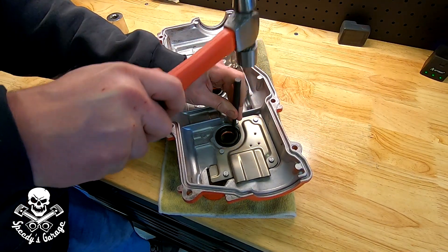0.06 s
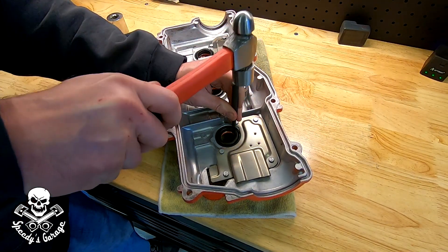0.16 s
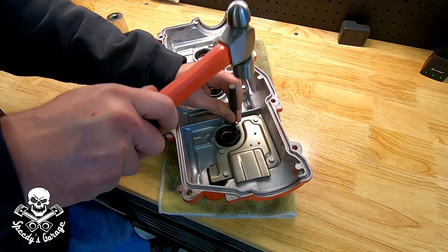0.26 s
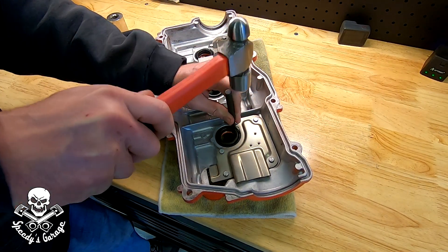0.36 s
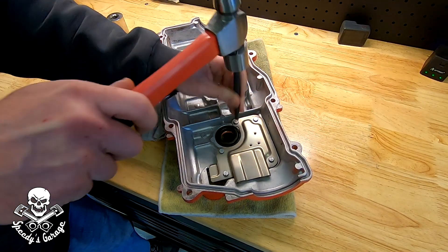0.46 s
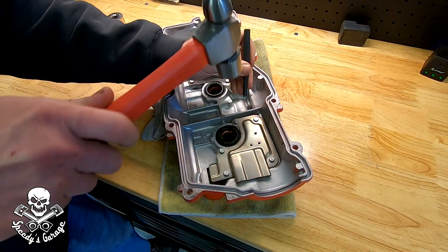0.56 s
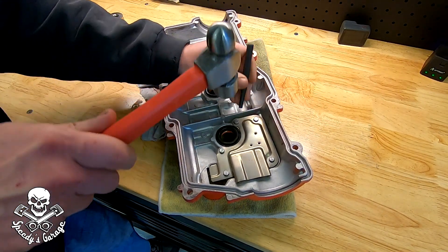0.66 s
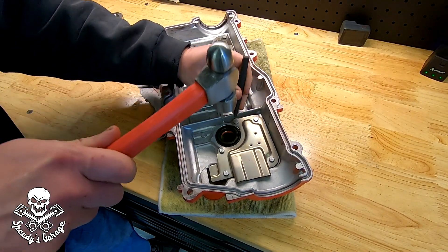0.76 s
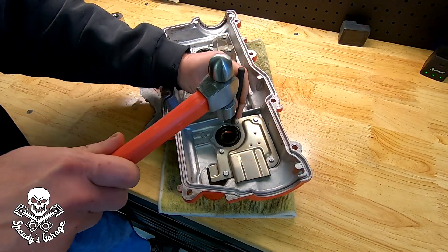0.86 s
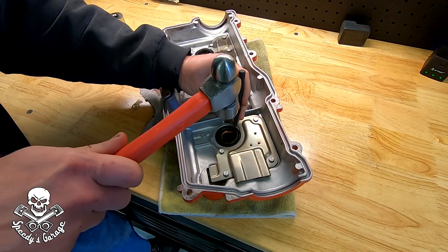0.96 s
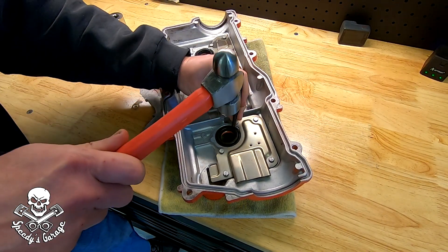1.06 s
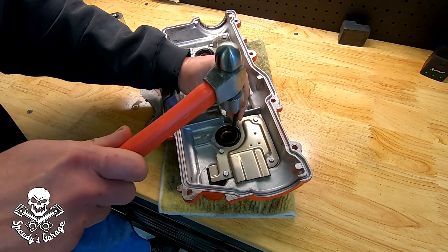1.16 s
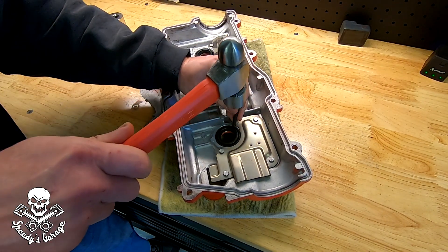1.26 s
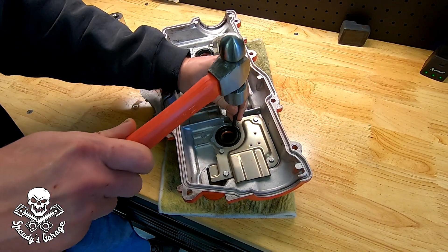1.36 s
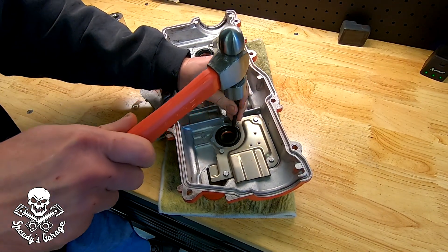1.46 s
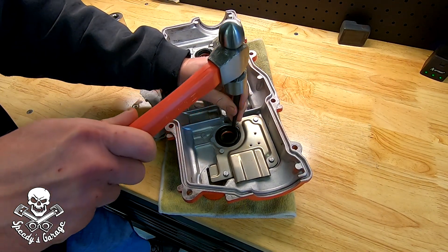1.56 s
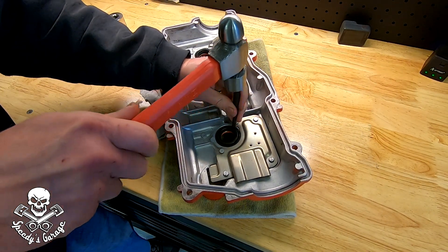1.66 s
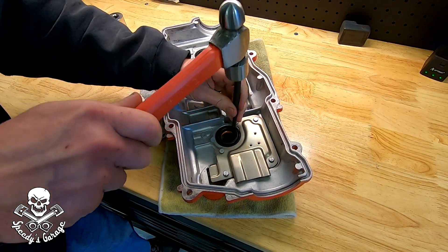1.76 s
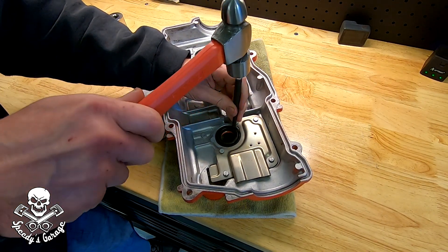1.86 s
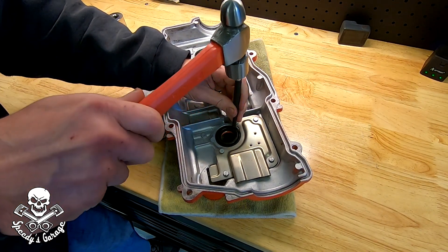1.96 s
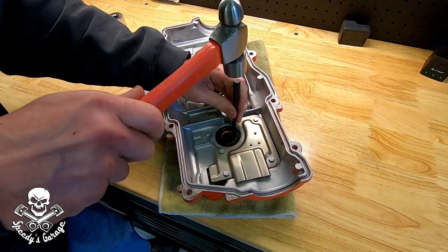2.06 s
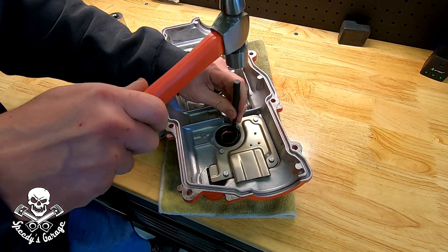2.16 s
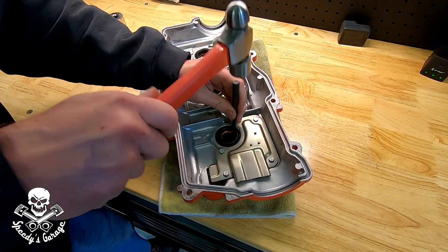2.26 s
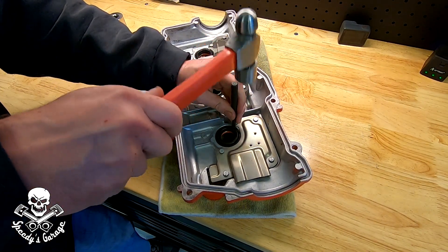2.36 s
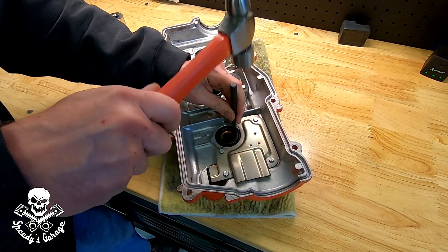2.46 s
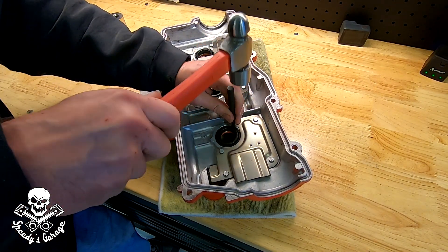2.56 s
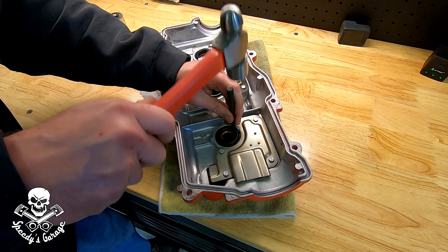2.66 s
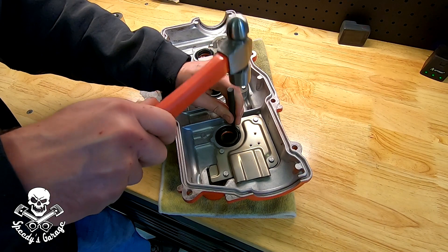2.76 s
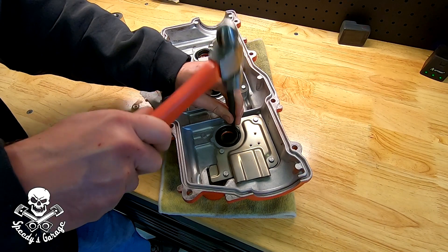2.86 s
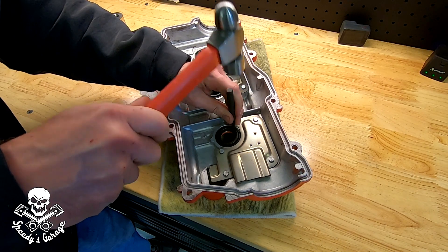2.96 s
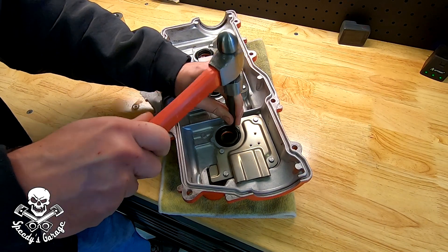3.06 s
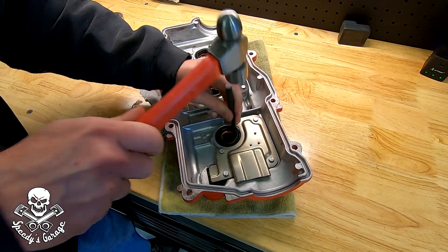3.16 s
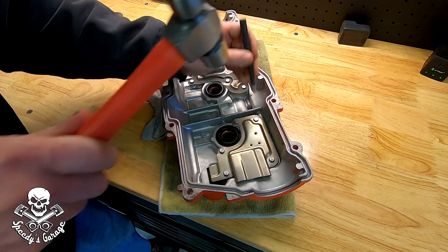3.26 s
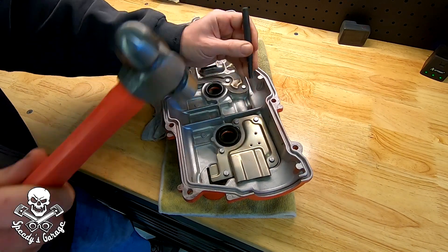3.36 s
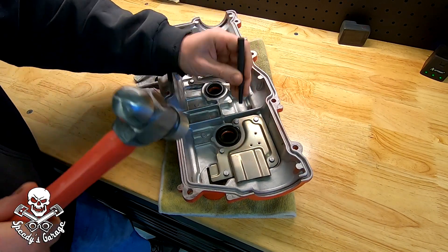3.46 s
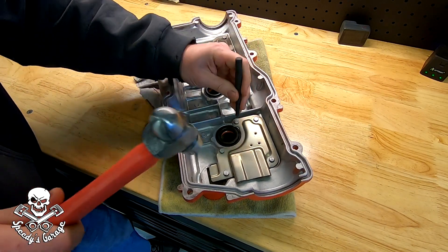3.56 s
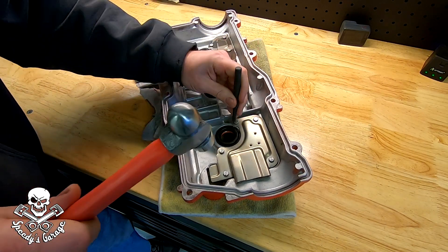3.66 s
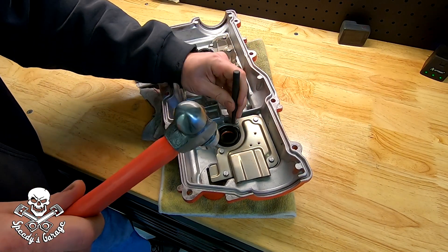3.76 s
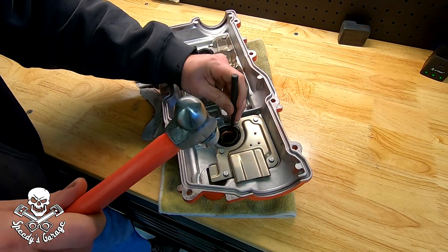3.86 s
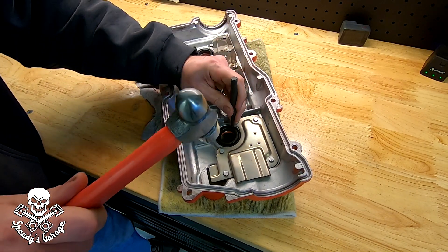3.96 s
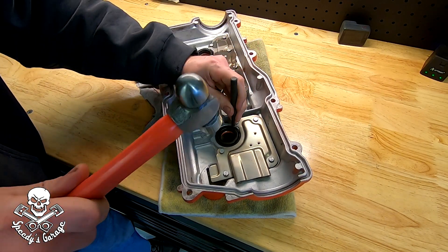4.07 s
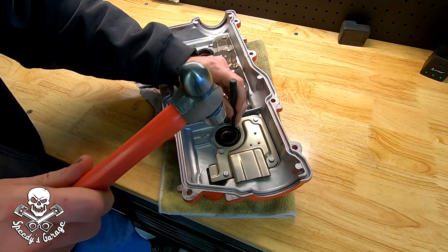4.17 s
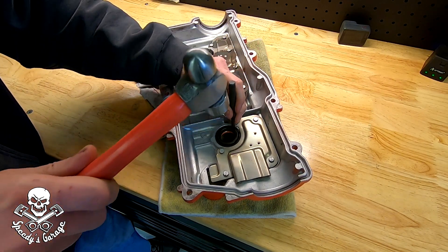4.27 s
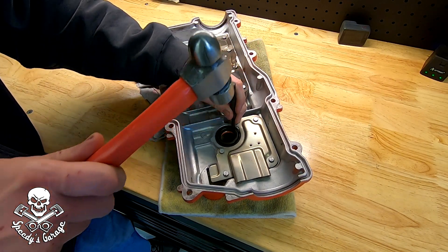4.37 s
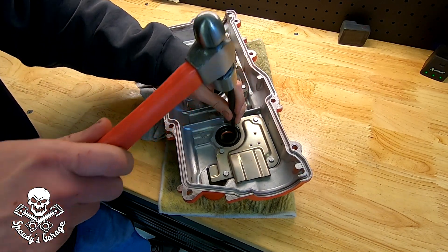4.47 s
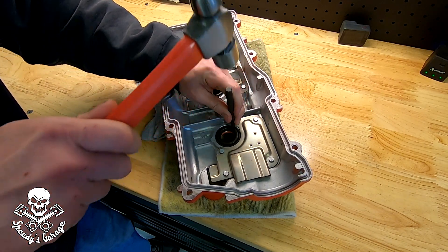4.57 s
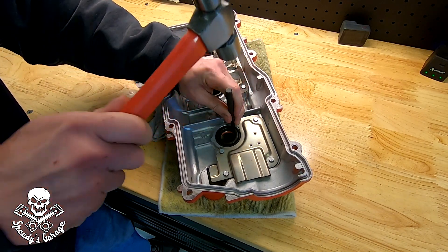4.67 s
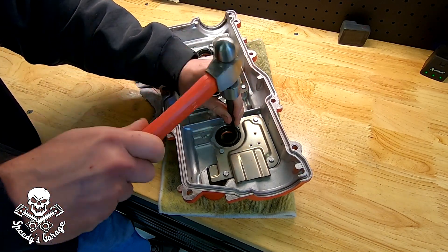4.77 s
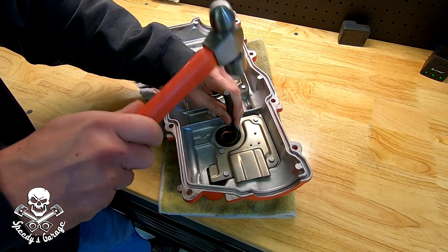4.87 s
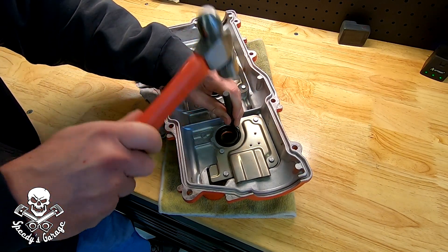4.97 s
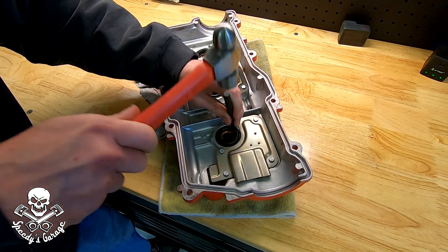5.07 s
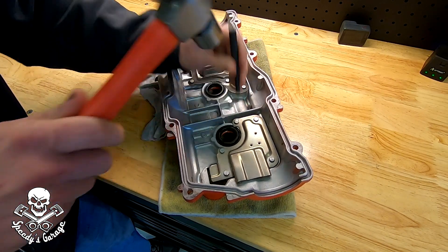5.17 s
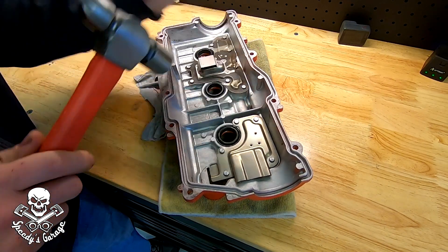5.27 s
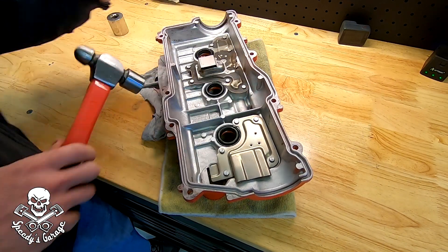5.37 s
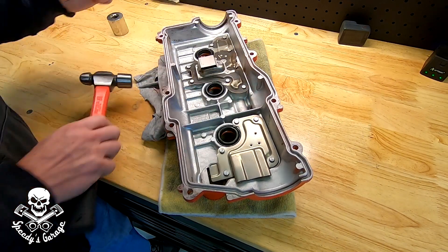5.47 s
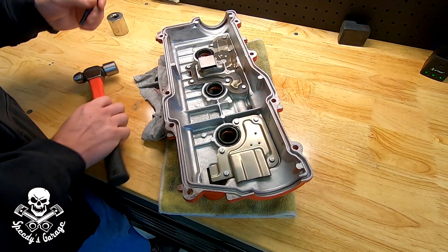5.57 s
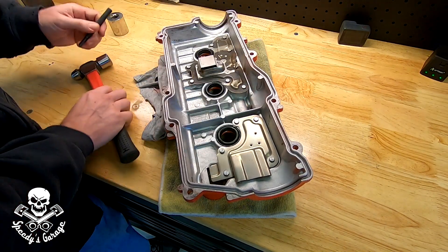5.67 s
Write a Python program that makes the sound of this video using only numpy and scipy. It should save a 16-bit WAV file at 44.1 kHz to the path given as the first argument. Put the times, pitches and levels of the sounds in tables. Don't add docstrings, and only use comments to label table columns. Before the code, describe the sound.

Close mono sound in a bare, reverberant garage, with a very faint low motor hum shifting between speeds, distant rumble and soft hiss. The echo of an earlier hammer blow is dying at the start. Two hard metallic clanks land at 0.15 and 0.34 s, each a bright steel click, a short aluminium ring and a woody bench thump, with nearly a second of room tail. At about 1.7 s the punch touches the cover with a tiny clink. Five blows follow at 2.35, 2.55, 2.73, 2.92 and 3.11 s, the first duller, the last firm and sharp. The room decays; a barely audible soft bump comes at 3.7 s. One blow hits at 4.8 s, then the loudest at 5.04 s, with less bench thump and a hollow ringing as the part comes loose. At 5.67 s the hammer clunks onto the wooden bench.

```python
import sys
import numpy as np
from scipy import signal
from scipy.fft import rfft, irfft, next_fast_len
from scipy.io import wavfile
from scipy.ndimage import uniform_filter1d, map_coordinates

SR = 44100
rng = np.random.default_rng(int(sys.argv[2]) if len(sys.argv) > 2 else 0)


def waveform_to_disk(signal):
    frames = np.transpose(np.atleast_2d(signal))
    scaled = np.clip(frames, -1, 1) * 32767
    samples = np.round(scaled).astype(np.int16)
    wavfile.write(sys.argv[1], SR, samples)


def volts_from_decibels(level):
    exponent = np.asarray(level, float) / 20
    return 10 ** exponent


N = 251590
LEAD = SR // 4

# start_s, low_pitch_hz, high_pitch_hz, low_level_db,
# high_level_db
MOTOR_TONES = [
    (0, 102.2, 158.2, -81, -76),
    (1.52, 120, 166.8, -69.5, -76),
    (3.2, 100, 158.3, -64.5, -66.5),
    (3.72, 112.3, 175.1, -69.5, -80),
    (5.098, 100, 157, -65.5, -67.5),
]
# pitch_hz, level_db (per Hz)
RUMBLE = [(12, -29), (25, 2), (50, 4.5), (75, -4.5), (150, -7.5), (300, -16), (600, -39.5)]
# pitch_hz, level_db (per Hz)
HISS = [(120, -36.5), (200, -5.5), (387, -3.5), (722, -7.5), (1040, -9), (3430, -15.5), (5840, -17),
        (16000, -22.5)]

# pitch_hz, decay_s (time to fall 60 dB)
GARAGE_DECAY = [(60, 0.51), (200, 0.71), (600, 0.82), (1500, 0.96), (3500, 1), (6000, 0.78), (9000, 0.56),
                (14000, 0.3)]
# pitch_hz, level_db
GARAGE_LEVEL = [(60, 1), (330, -1), (600, 2.5), (1100, -2), (1650, 2), (2800, 0), (4600, -5), (9000, -8),
                (11000, -5.5), (12500, -5.5), (15500, -7)]

# start_s, level_db, pitch_hz, decay_s
ARM_BUMPS = [
    (3.715, -43, 78, 0.12),
]
# start_s, level_db (peak)
PUNCH_SET_DOWN = [
    (1.671, -44.5),
]
# pitch_hz, level_db, decay_s
SET_DOWN_RING = [(577, -5, .04), (955, -7, 0.23), (1120, -3, .08), (1160, -14, .1), (1950, -13, 0.042),
                 (2800, -13, 0.033), (4040, -17.5, 0.059)]
# start_s, level_db (peak)
HAMMER_LAID_DOWN = [
    (5.666, -9),
]
# pitch_hz, level_db (per Hz)
WOOD_LEVEL = [(53, -32.5), (90, 0), (335, -0.5), (611, -7.5), (857, -1.5), (1620, -10.5), (1990, -13.5),
              (2410, -29), (4070, -25.5), (8000, -54.5), (10400, -86), (17600, -120)]
# pitch_hz, decay_s
WOOD_DECAY = [(100, 0.047), (600, 0.041), (2000, 0.029), (5000, 0.033)]

# start_s,
# level_db, firmness_db (how firmly the punch sits), sharpness_db (how sharply steel meets steel)
HAMMER_BLOWS = [
    (-0.036, -7.5, 8, 6.5),
                (0.15, -4, 2, 7),
    (0.341, -3.5, -1.5, 3.5),
    (2.346, -4.5, 0.6, 0.44),
    (2.552, -3, 1.1, 7.5),
    (2.733, -2.5, 1.5, 4.1),
    (2.917, -2, 1.3, 4.5),
    (3.11, -3.1, 3.3, 7),
    (4.8, -2.5, 2.5, 1.8),
]
LAST_BLOW = [
    (5.0365, 5.8, -6.5, 6),
]
SHARE_HZ = [250, 1200, 4500, 8500]
STRONG_HZ = [45, 76, 131, 350, 479, 565, 693, 944, 1084, 1243, 1624, 1735, 1892, 2206, 2790, 3029, 4042,
             4340, 4850, 5100, 5416, 5905, 7190, 9400]
# level_db, decay_s
STRONG_RING = [(-23.5, .1), (-18, 0.13), (-6, 0.12), (-9.5, 0.12), (-17.5, 0.54), (-16, 0.2), (-19, 0.33),
               (-7.5, 0.089), (0.5, 0.1), (-26, 0.086), (-7, 0.15), (-18.5, .12), (-10.5, 0.079),
               (-23, 0.19), (-10, 0.091), (-17, 0.06), (-6, 0.055), (-13.5, 0.07), (-19, 0.0058),
               (-7.5, 0.052), (-19.5, 0.018), (-20, 0.044), (-20, 0.038), (-20.5, 0.036)]
# pitch_hz, level_db (per Hz)
MINOR_LEVEL = [(35, -40), (60, -8), (230, -2), (810, -7.5), (1110, -6.5), (1660, -13.5), (2140, -25),
               (2770, -6.5), (3400, -14), (4500, -6), (5200, -10), (5590, -19.5), (9570, -17), (16000, -53)]
# pitch_hz, decay_s
MINOR_DECAY = [(100, 0.067), (500, 0.11), (2000, 0.039), (6000, 0.016), (14000, 0.019)]
# pitch_hz, level_db, decay_s
FREED_RING = [(136, -22, 0.24), (308, -27, 0.036), (594, -18.5, 0.12), (718, -20, 0.11), (930, -16.5, 0.57),
              (956, -12, 0.23), (1100, -39, 0.09), (1200, -4.5, 0.074), (1352, -30, 0.4)]


def unit(x):
    return x / np.sqrt(np.mean(x ** 2) + 1e-20)


def along(points, hz):
    f, v = np.transpose(points)
    return np.interp(np.log(hz + 1), np.log(f + 1), v)


def wobble(rate):
    knots = rng.standard_normal(int(N * rate / SR) + 4)
    return map_coordinates(knots, [np.arange(N) * rate / SR])


def noise(spectrum):
    m = next_fast_len(N + 8192)
    white = rfft(rng.standard_normal(m))
    gain = volts_from_decibels(along(spectrum, np.fft.rfftfreq(m, 1 / SR)))
    return unit(irfft(white * gain, m)[:N])


def motor_tone(hz, db):
    sway_db, drift_hz = 1, 1.7
    level = volts_from_decibels(db + 2.5 + sway_db * wobble(14))
    turns = np.cumsum(hz + drift_hz * wobble(13)) / SR
    return level * np.sin(2 * np.pi * turns)


def motor():
    start, *state = np.transpose(MOTOR_TONES)
    now = np.searchsorted(start, np.arange(N) / SR, "right") - 1
    low_hz, high_hz, low_db, high_db = uniform_filter1d(np.array(state)[:, now], size=SR // 30, axis=1)
    return motor_tone(low_hz, low_db) + motor_tone(high_hz, high_db)


def background():
    rumble_db, sway_db, hiss_db = -66, 0.5, -70.5
    rumble = volts_from_decibels(rumble_db + sway_db * wobble(1.4)) * noise(RUMBLE)
    return rumble + motor() + volts_from_decibels(hiss_db) * noise(HISS)


def garage(x):
    hz, t, z = signal.stft(rng.standard_normal(SR + SR // 4), SR, nperseg=256)
    t = np.maximum(t - 0.008, 0)
    build = 1 - np.exp(-(t / 0.012) ** 2)
    far_wall = 1 + 0.67 * np.exp(-((t - 0.036) / 0.0037) ** 2)
    z = z * build * far_wall * volts_from_decibels(-60 * t / along(GARAGE_DECAY, hz)[:, None])
    z = z / np.linalg.norm(z, axis=1, keepdims=True) * volts_from_decibels(along(GARAGE_LEVEL, hz))[:, None]
    tail = signal.istft(z, SR, nperseg=256)[1]
    return signal.fftconvolve(x, volts_from_decibels(-8.5) * tail / np.linalg.norm(tail))


def add(track, s, x, beamed=0, hidden=0):
    heard = garage(x + volts_from_decibels(-6) * beamed + hidden)
    heard[:len(x)] += x + beamed
    part = track[round(s * SR) + LEAD:][:len(heard)]
    part += heard[:len(part)]


def ringing(hz, db, t60, attack, phase=0, size=SR // 4):
    t = np.arange(size) / SR
    waves = np.sin(2 * np.pi * np.outer(hz, t) + np.reshape(phase, (-1, 1)))
    waves = waves * volts_from_decibels(-60 * t / np.clip(t60, 0.005, 0.9)[:, None])
    fade_out = np.sqrt(1 - t / t[-1])
    return volts_from_decibels(db) @ waves * (1 - np.exp(-t / attack)) * fade_out


def crowd(spectrum, t60s, top, count):
    place = (np.arange(count) + rng.uniform(0, 1, count)) / count
    hz = (8 + (np.sqrt(top) - 8) * place) ** 2
    db = along(spectrum, hz) + 5 * np.log10(hz / 1000)
    t60 = along(t60s, hz) * rng.uniform(0.88, 1.4, count)
    return hz, db, t60, rng.uniform(0, 2 * np.pi, count)


def knocks():
    track = np.zeros(N + LEAD)
    for s, db, hz, t60 in ARM_BUMPS:
        add(track, s, ringing([hz, 1.5 * hz], [db, db - 5], [t60, t60], 0.0064))
    hz, level, t60 = np.transpose(SET_DOWN_RING)
    for s, db in PUNCH_SET_DOWN:
        add(track, s - 0.001, volts_from_decibels(db - 3.5) * ringing(hz, level, t60, 0.00081))
    hz, level, t60, phase = crowd(WOOD_LEVEL, WOOD_DECAY, 7550, count=60)
    for s, db in HAMMER_LAID_DOWN:
        add(track, s + 0.0016, volts_from_decibels(db - 6.5) * ringing(hz, level, t60, 0.00072, phase))
    return track[LEAD:]


def burst(t, db, t60, band_hz, order):
    band = signal.butter(order, band_hz, "band", fs=SR, output="sos")
    return band, rng.standard_normal(len(t)) * volts_from_decibels(db - 60 * t / t60)


def taps():
    track = np.zeros(N + LEAD)
    hz, (level, t60) = np.array(STRONG_HZ), np.transpose(STRONG_RING)
    minor_hz, minor_db, minor_t60, minor_phase = crowd(MINOR_LEVEL, MINOR_DECAY, 16020, count=380)
    t = np.arange(SR // 7) / SR
    thump_db, thump_follows = -2.4, 0.76
    for s, db, firm_db, sharp_db in HAMMER_BLOWS + LAST_BLOW:
        bench_db = thump_db + thump_follows * firm_db
        lean = np.transpose([SHARE_HZ, [bench_db, 0, firm_db, sharp_db]])

        strong_db = level + along(lean, hz) + rng.normal(0, 0.64, len(hz))
        strong = ringing(hz, strong_db, t60, 0.00069, size=len(t))
        scatter = rng.standard_normal((2, len(minor_hz)))
        blow_db = minor_db - 12 + along(lean, minor_hz) + 2.3 * scatter[0]
        minor = ringing(minor_hz, blow_db, minor_t60, 0.00057, minor_phase + 0.07 * scatter[1], size=len(t))

        band, rough = burst(t, -10 + sharp_db, 0.022, [3560, 8040], 3)
        crack = signal.sosfilt(band, rough)
        band, rough = burst(t, 8 + bench_db, 0.012, [198.5, 4000], 2)
        thud = signal.sosfilt(band, rough)
        band, rough = burst(t, 14 + bench_db, 0.045, [184, 450], 2)
        knock = signal.sosfilt(band, rough * (1 - np.exp(-t / 0.0015)))

        size = volts_from_decibels(db - 6.5)
        add(track, s - 0.0003, size * (minor + crack + knock), size * strong, size * thud)
    add(track, LAST_BLOW[0][0], ringing(*np.transpose(FREED_RING), 0.009, size=SR // 2))
    return track[LEAD:]


def scene():
    return (background() + knocks() + taps())[None]


def band_limit(x):
    return signal.sosfilt(signal.butter(12, 16470, fs=SR, output="sos"), x)


def record(dry):
    low_hz, top_hz, full_scale = 24, 16750, 0.97
    heard = signal.sosfilt(signal.butter(2, low_hz, "high", fs=SR, output="sos"), dry)
    rounded = heard / (1 + np.abs(heard / full_scale) ** 4) ** (1 / 4)
    finished = signal.sosfilt(signal.cheby2(12, 60, top_hz, fs=SR, output="sos"), rounded)
    return band_limit(finished)


dry = scene()
out = record(dry)
waveform_to_disk(out)
```